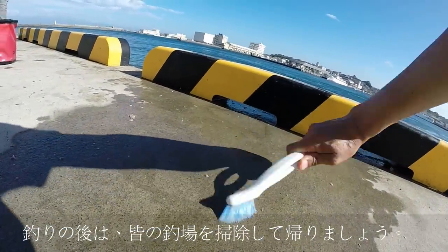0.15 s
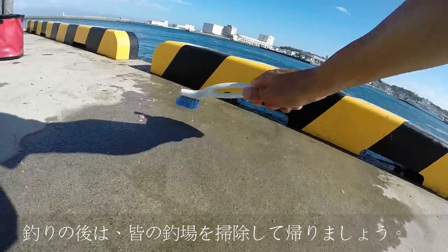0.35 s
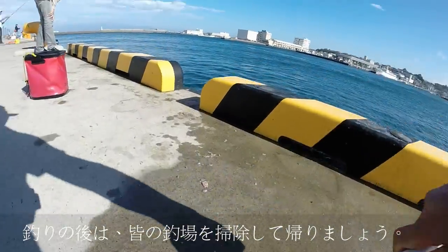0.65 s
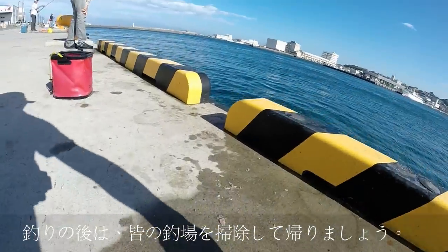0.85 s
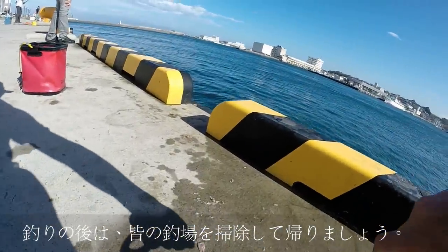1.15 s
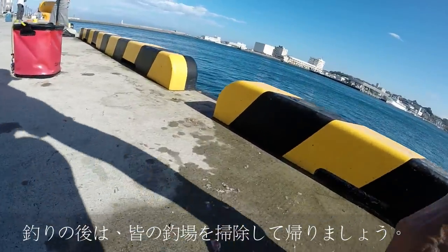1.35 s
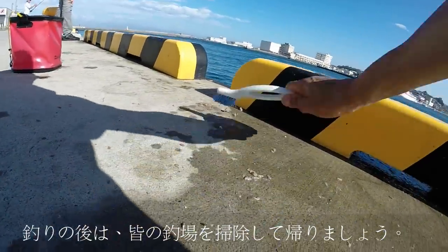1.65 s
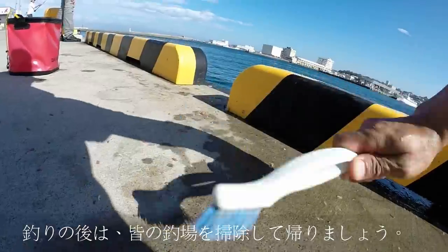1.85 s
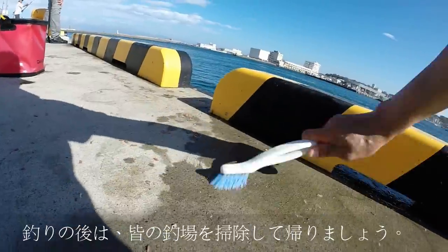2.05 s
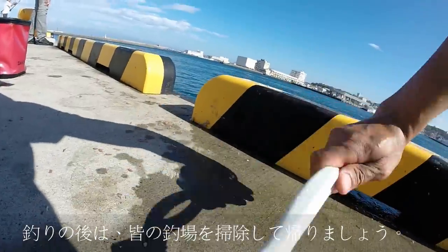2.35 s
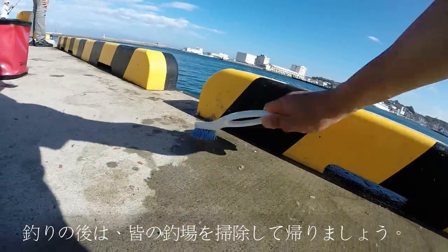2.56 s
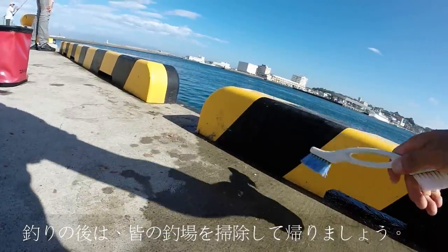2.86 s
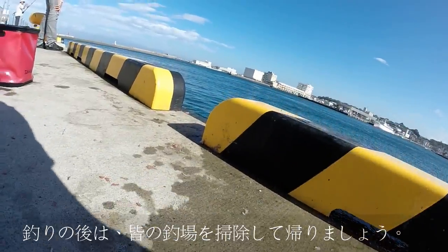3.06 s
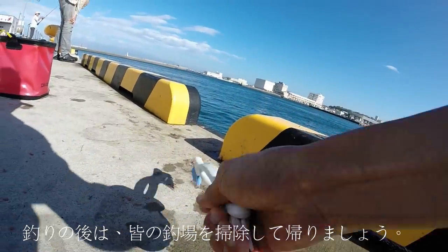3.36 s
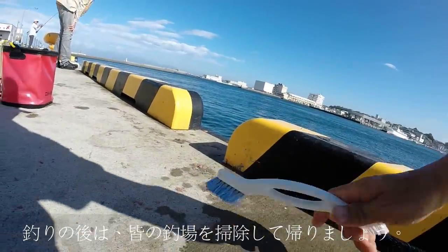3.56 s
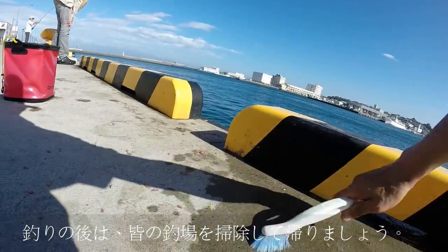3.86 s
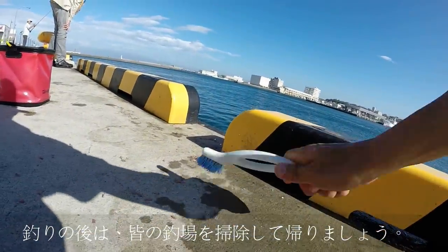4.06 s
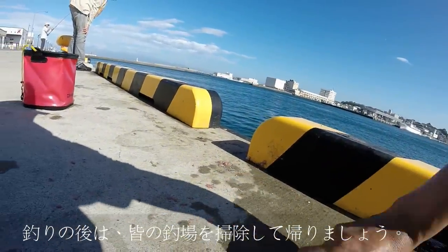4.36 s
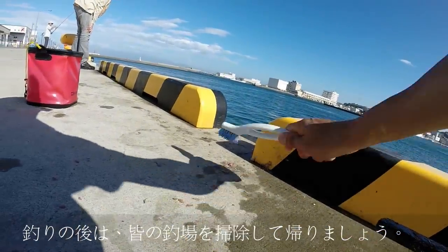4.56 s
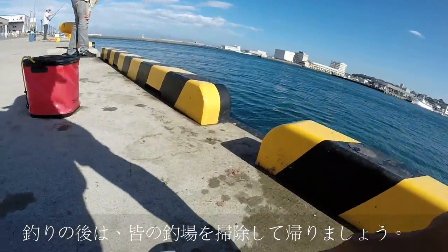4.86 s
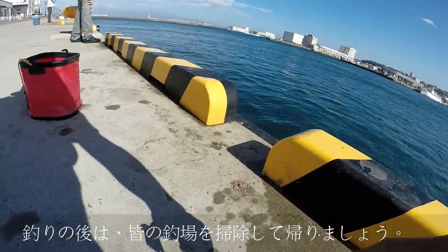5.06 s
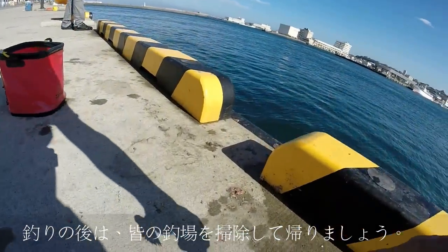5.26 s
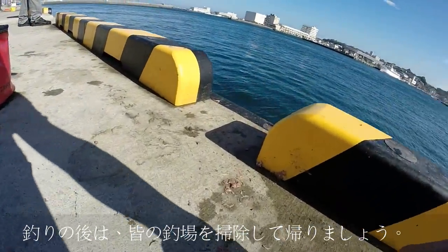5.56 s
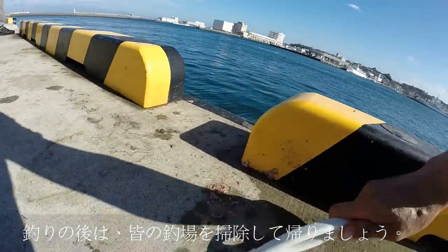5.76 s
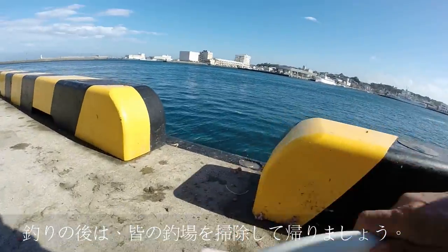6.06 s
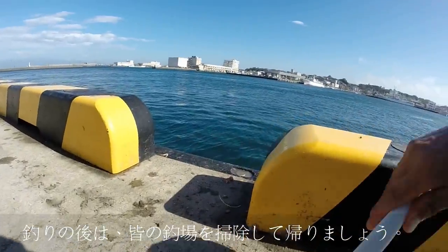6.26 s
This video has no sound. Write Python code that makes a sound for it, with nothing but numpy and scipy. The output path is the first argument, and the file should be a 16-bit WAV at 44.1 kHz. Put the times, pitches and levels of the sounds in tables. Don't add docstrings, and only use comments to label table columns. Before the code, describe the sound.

Brief raspy bristle scrapes on a wet quay, separated by quiet gaps of muffled water hiss, small clicks and soft low bumps.

```python
import sys
import numpy as np
from scipy import signal
from scipy.fft import rfft, irfft
from scipy.io import wavfile
from scipy.ndimage import uniform_filter1d

SR = 44100
rng = np.random.default_rng(int(sys.argv[2]) if len(sys.argv) > 2 else 0)


def magnitude_from_level(level_db):
    exponent = np.asarray(level_db, float) / 20
    return 10 ** exponent


def dump(signal):
    limited = np.clip(np.atleast_2d(signal).T, -1, 1)
    pcm = np.round(limited * 32767).astype(np.int16)
    wavfile.write(sys.argv[1], SR, pcm)


N = 282681


def evened(x):
    return x / np.sqrt(np.mean(x ** 2) + 1e-20)


def read(points, hz):
    f, value = np.transpose(points)
    return np.interp(np.log(hz + 1), np.log(f + 1), value)


def curve(rows):
    return np.interp(np.arange(N) / SR, *np.transpose(rows))


def add(mix, start_s, sound):
    part = mix[round(start_s * SR):][:len(sound)]
    part += sound[:len(part)]


def delayed(x, seconds):
    hz = np.fft.rfftfreq(len(x), 1 / SR)
    return irfft(rfft(x) * np.exp(-2j * np.pi * hz * seconds), len(x))


def colour(x, db_at, size=8192):
    hz = np.fft.rfftfreq(size, 1 / SR)
    log_gain = np.log(magnitude_from_level(np.maximum(db_at(hz), -100)))
    circle = np.concatenate([log_gain, log_gain[-2:0:-1]])
    taps = np.fft.ifft(np.exp(np.conj(signal.hilbert(circle)))).real
    return signal.oaconvolve(x, taps[:size // 2])[:len(x)]


def band_db(hz, low_hz, high_hz):
    return -10 * np.log10((1 + (low_hz / (hz + 1)) ** 16) * (1 + (hz / high_hz) ** 16))


def rings_db(hz, rings):
    lift = sum(magnitude_from_level(db) / (1 + (2 * (hz - f) / width_hz) ** 2) for f, width_hz, db in rings)
    return 20 * np.log10(1 + lift)


def housing_db(hz):
    # (frequency [Hz], density [dB per Hz])
    broad = [(590, -80), (1000, -22), (1230, -16.5), (1640, -18.5), (1970, -18), (2470, -7), (3180, -6.5),
             (3610, -20), (4100, -6), (4600, -8.5), (5340, -15), (6120, 3), (8060, -13.5), (12000, -14),
             (15500, -18)]
    # (frequency [Hz], width [Hz], lift [dB])
    sharp = [(2400, 760, 1.5), (4796, 380, 11), (5470, 250, 11), (6830, 620, -7.5), (9500, 210, -7),
             (11500, 1000, -5), (13500, 2700, -7)]
    return read(broad, hz) + rings_db(hz, sharp)


def wander(size):
    return evened(uniform_filter1d(uniform_filter1d(rng.standard_normal(N), size), size))


def flicks(per_s, spread_db):
    sizes = magnitude_from_level(spread_db * np.minimum(rng.exponential(1, N), 3))
    return sizes * rng.choice([-1., 1.], N) * (rng.random(N) < per_s / SR)


def bristle_band(jumps, per_s, spread_db, low_hz, high_hz):
    clicks = jumps * flicks(per_s, spread_db)
    return evened(colour(clicks, lambda hz: housing_db(hz) + band_db(hz, low_hz, high_hz)))


def bounced(x, share):
    share = np.clip(share, 0, .95)
    notch_spacing_hz = 4220
    return (x - share * delayed(x, 1 / notch_spacing_hz)) / np.sqrt(1 + share ** 2)


def hand():
    # (time [s], pressure [dB])
    strokes = [
        [(.168, -73), (.187, -46), (.203, -34.5), (.253, -25), (.275, -29), (.29, -46), (.302, -78)],
        [(1.458, -75), (1.495, -54), (1.57, -41), (1.637, -26.5), (1.662, -34.5), (1.678, -50), (1.692, -80)],
        [(2.022, -65), (2.05, -41), (2.085, -32.5), (2.108, -24.5), (2.136, -29.5), (2.153, -43), (2.168, -86)],
        [(2.494, -55), (2.51, -49), (2.522, -36), (2.57, -24), (2.588, -28.5), (2.61, -48), (2.628, -76)],
        [(3.17, -67), (3.204, -49), (3.26, -43.5), (3.305, -44.5), (3.335, -38.5), (3.357, -45.5), (3.372, -74)],
        [(3.81, -68), (3.864, -43), (3.9, -37.5), (3.935, -27), (3.966, -28.5), (3.978, -43), (3.99, -77)],
        [(4.366, -68), (4.379, -52), (4.414, -35.5), (4.442, -32), (4.496, -40), (4.512, -57), (4.524, -82)],
        [(5.7, -72), (5.735, -60), (5.799, -43), (5.869, -31.5), (5.915, -39), (5.936, -53), (5.948, -78)],
    ]
    leans = [(.15, 0.44, 0.37), (0.5, 0.37, 0.43), (0.3, 0.5, 0.33), (0.3, 0.36, 0.44), (.6, 0.8, .26),
             (0.5, 0.54, 0.4), (0, 0, 0.76), (.5, 0.3, 0.4)]
    # (roots [dB], tips [dB], handle [dB],
    # roots and handle gain touch to lift [dB], tips gain touch to lift [dB])
    grips = [(-6, -4.5, -16, -6, -2), (-1.5, -2, -9.5, -10.5, -8), (-5.5, -7, -15.5, -2, 9),
             (-8, -4, -14, -8, -4), (-6, -14, -12, 0, 8), (-4, -7.5, -13, -5.5, 8),
             (-5.5, -1.5, -14, 2, -6), (-5.5, -2.5, -12.5, -2, -6)]
    t = np.arange(N) / SR
    pressure_db = np.full(N, -90.)
    stiff, echo_share, touching = np.zeros((3, N))
    grip_db = np.zeros((3, N))
    for rows, grip, lean in zip(strokes, grips, leans):
        roots, tips, handle, low_roll, tip_roll = grip
        echo, stiff_touch, stiff_lift = lean
        s, db = np.transpose(rows)
        on = (t > s[0]) & (t <= s[-1])
        pressure_db[on] = np.interp(t[on], s, db)
        touching[on] = 1
        roll = (t[on] - s[0]) / (s[-1] - s[0]) - .5
        grip_db[:, on] = roots + low_roll * roll, tips + tip_roll * roll, handle + low_roll * roll
        stiff[on] = np.interp(t[on], s[[0, -1]], [stiff_touch, stiff_lift])
        echo_share[on] = echo * np.clip((db.max() - pressure_db[on]) / 31, 0, 1)
    return pressure_db, grip_db, stiff, np.clip(echo_share, 0, .95), touching


def snags():
    # (time [s], lift [dB])
    jolts = [
        (.228, 4),
        (1.593, 7),
        (2.08, 4.5),
        (2.555, 4),
        (3.334, 1.5),
        (3.95, 2),
        (4.445, 3),
        (5.82, 5.5),
        (5.882, 3.5),
    ]
    t, snag_s = np.arange(N) / SR, 0.019
    return sum(db * np.exp(-((t - s) / snag_s) ** 2) for s, db in jolts)


def brush():
    pressure_db, grip_db, stiff, echo_share, touching = hand()
    firm_db, light_db = -31.5, -42
    eased_db = firm_db - np.maximum(pressure_db, light_db)
    sink_db_per_db = [0.067, 0.21, 0.34]
    roots_db, tips_db, handle_db = grip_db + np.outer(sink_db_per_db, eased_db)
    snag_db = snags()
    roots_db, handle_db = roots_db + snag_db, handle_db + snag_db

    jumps = magnitude_from_level(0.8 * wander(size=40) + 0.5 * wander(size=300))
    shafts = bristle_band(jumps, per_s=10000, spread_db=1.4, low_hz=5060, high_hz=8870)
    roots = bristle_band(jumps, per_s=9000, spread_db=2.1, low_hz=3480, high_hz=5200)
    handle = bristle_band(jumps, per_s=7000, spread_db=1.9, low_hz=740, high_hz=3520)
    bent = bristle_band(jumps, per_s=14000, spread_db=2.8, low_hz=8600, high_hz=9500)
    upright = bristle_band(jumps, per_s=16000, spread_db=1.2, low_hz=10700, high_hz=14000)
    lean_rad = np.pi / 2 * np.clip(stiff, 0, 1)
    tips = np.cos(lean_rad) * bent + np.sin(lean_rad) * upright

    tips = bounced(tips, echo_share)
    shafts = bounced(shafts, 0.34 * echo_share)
    sound = shafts + magnitude_from_level(roots_db) * roots + magnitude_from_level(tips_db) * tips + magnitude_from_level(handle_db) * handle
    return magnitude_from_level(pressure_db) * sound * uniform_filter1d(touching, size=60)


def click_clusters(rows, rise):
    out = np.zeros(N)
    noise = rng.standard_normal((len(rows), 2048))
    t = np.arange(2048) / SR
    for (start_s, db, hz, length_s, width), burst in zip(rows, noise):
        shape_db = lambda f: -10 * np.log10(1 + ((f / hz - hz / (f + 1)) / width) ** 4)
        envelope = np.exp(-(t / length_s) ** 2) * np.minimum(t / (rise * length_s), 1)
        add(out, start_s, magnitude_from_level(db) * evened(colour(burst, shape_db, size=1024)) * envelope)
    return out


def ticks():
    # (time [s], level [dB], centre [Hz], length [s], width [share of centre])
    grit = [(.151, -52, 2900, .005, .6), (1.008, -49, 1400, .0054, .9), (1.029, -46.5, 1100, 0.0052, 1.6),
            (1.278, -40.5, 1840, 0.0092, .28), (1.279, -53, 5200, .008, 0.46), (1.312, -47, 2300, .004, .6),
            (2.021, -47, 5500, .004, 0.44), (2.4955, -34.5, 2470, 0.0024, 0.21),
            (2.4955, -42, 5500, .003, .3), (3.09, -47.5, 2400, .004, 1.8), (3.319, -41, 4540, 0.021, .3),
            (4.375, -45, 5700, .004, 0.37), (5.2355, -45, 2480, 0.0044, 0.46),
            (5.375, -44.5, 2900, 0.013, 0.44), (5.378, -53, 1700, .008, .5),
            (5.377, -49.5, 5500, .012, 0.4), (5.589, -44.5, 2620, 0.0064, 0.19),
            (5.7075, -40, 2630, 0.0023, .3), (6.167, -49, 2330, 0.0042, .5)]
    return click_clusters(grit, rise=0.37)


def rustles():
    # (time [s], level [dB], centre [Hz], length [s])
    brushes = [(1.278, -70, 10900, .008), (2.02, -64, 10000, .006), (2.4955, -46, 10500, .006),
               (3.09, -60, 10500, 0.0046), (3.137, -65, 12000, .004), (3.148, -62, 11900, .004),
               (3.157, -66, 11500, .004), (3.18, -70, 11800, .005), (3.415, -63, 9500, .008),
               (3.448, -60, 10900, .003), (4.73, -66, 8600, .006), (5.218, -64, 9600, .003),
               (5.378, -68, 10000, .011), (5.59, -62, 8900, .01), (5.613, -67, 12000, .004),
               (5.703, -64, 9400, .01), (6.281, -62, 10300, .02), (6.303, -65, 9500, .03),
               (6.318, -68, 11000, .012)]
    return click_clusters([(*row, 0.3) for row in brushes], rise=0.36)


def bumps():
    # (time [s], peak [dB], start pitch [Hz], length [s])
    knocks = [
        (0.572, -33.5, 111.4, 0.14),
        (1.85, -45, 35, 0.076),
        (2.491, -52, 120, 0.028),
        (4.033, -41.5, 132, 0.042),
        (4.875, -40.5, 40, .085),
        (5.293, -44, 32, 0.1),
        (6.279, -39.5, 103, 0.05),
    ]
    out = np.zeros(N)
    for start_s, db, start_hz, length_s in knocks:
        t = np.arange(0, length_s, 1 / SR)
        end_hz = 1.37 / length_s
        pitch_hz = end_hz + (start_hz - end_hz) * np.exp(-t / (0.25 * length_s))
        turns = np.cumsum(pitch_hz) / SR
        add(out, start_s, magnitude_from_level(db) * np.sin(np.pi * t / length_s) * np.sin(2 * np.pi * turns))
    return out


def wash():
    # (frequency [Hz], density [dB per Hz])
    water = [(71, -28), (120, -1.5), (305, -7), (337, -8), (758, -12.5), (839, -13.5), (1540, -16),
             (1960, -18.5), (2410, -12), (3190, -13), (3680, -25.5), (4790, -14), (15200, -46)]
    # (frequency [Hz], width [Hz], lift [dB])
    water_rings = [(3980, 410, 1), (2400, 210, -8.5), (4770, 70, -3), (5700, 210, 0.5), (6180, 170, -7),
                   (7040, 320, -11), (9400, 330, -10), (11140, 480, -1.5), (13300, 700, -6),
                   (14500, 500, 0)]
    # (time [s], level [dB])
    level = [(0.0, -56.5), (5.4, -56.5), (6.41, -57)]
    frames, hz = N // 128 + 5, np.fft.rfftfreq(512, 1 / SR)
    a, b, patches = rng.standard_normal((frames, 257, 3)).T
    patches = evened(uniform_filter1d(uniform_filter1d(patches, 10, 0), 24, 1))
    flicker = evened(uniform_filter1d(rng.standard_normal(frames), 8))
    airborne = np.clip((hz[:, None] - 1200) / 1000, 0, 1)
    z = (a + 1j * b) * magnitude_from_level(airborne * (0.86 * patches + 0.35 * flicker))
    x = signal.istft(z, nperseg=512, noverlap=384)[1][:N]
    top_db = lambda f: -10 * np.log10(1 + (f / 14950) ** 120)
    x = colour(x, lambda f: read(water, f) + rings_db(f, water_rings) + top_db(f))
    in_band = colour(x, lambda f: band_db(f, 2000, 7000))
    return magnitude_from_level(curve(level)) * x / np.std(in_band)


def rumble():
    # (time [s], level [dB])
    level = [(0.0, -56), (.2, -52.5), (.55, -52.5), (.75, -51.5), (1.55, -50), (2.2, -53.5), (2.45, -54),
             (3.3, -56), (4.05, -56), (4.95, -51), (5.44, -56), (5.87, -52), (6.41, -56)]
    # (frequency [Hz], density [dB per Hz])
    spectrum = [(4.7, -42), (8.0, 4), (28, 1.5), (65, -5.5), (97, -5), (118, -16.5), (160, -19.5),
                (210, -41), (350, -120)]
    noise = colour(rng.standard_normal(N), lambda hz: read(spectrum, hz), size=32768)
    return magnitude_from_level(curve(level)) * evened(noise)


def scene():
    return (brush() + ticks() + rustles() + bumps() + wash() + rumble())[None]


def top_cut(x):
    return signal.sosfilt(signal.butter(12, 15670, fs=SR, output="sos"), x)


def record(dry):
    edge = signal.firwin(1023, 15300, window=("kaiser", 9), fs=SR)
    mix = signal.oaconvolve(dry, edge[None], "same")
    return top_cut(mix)


dry = scene()
out = record(dry)
dump(out)
```